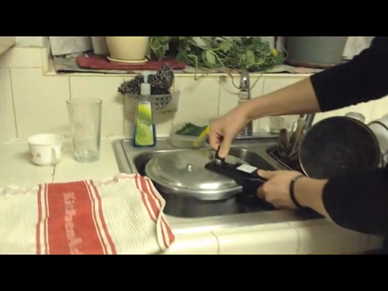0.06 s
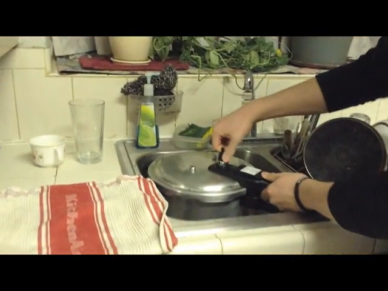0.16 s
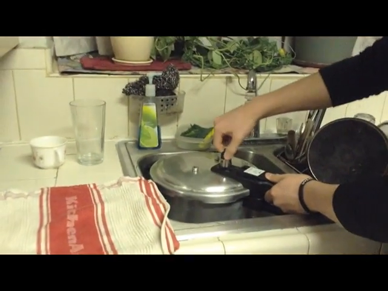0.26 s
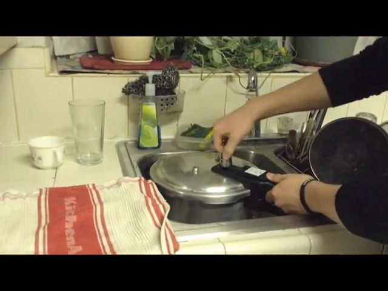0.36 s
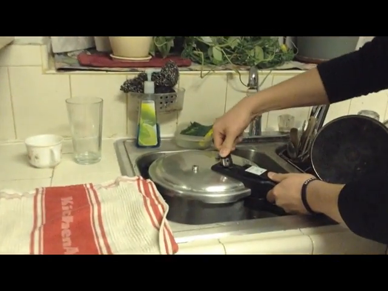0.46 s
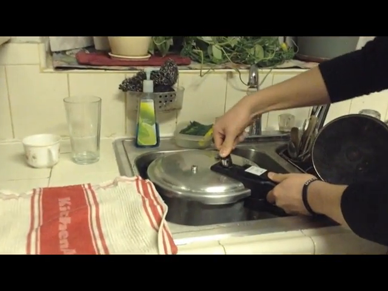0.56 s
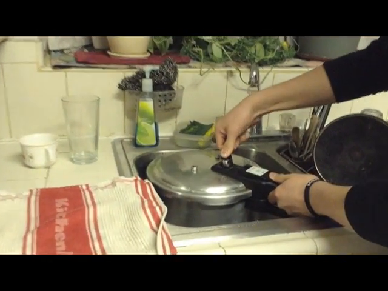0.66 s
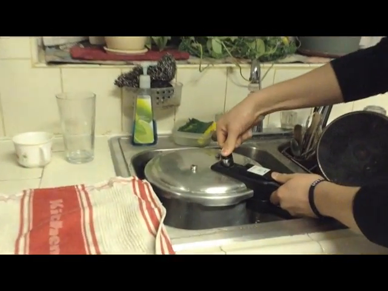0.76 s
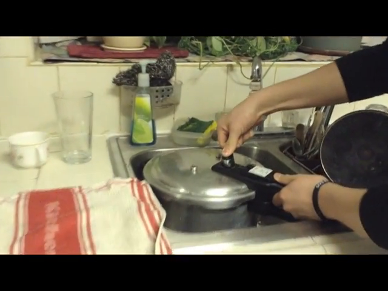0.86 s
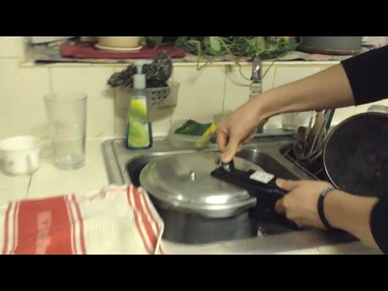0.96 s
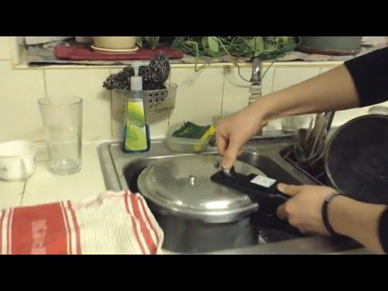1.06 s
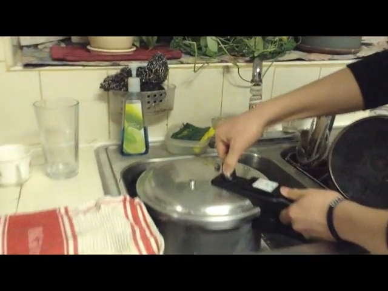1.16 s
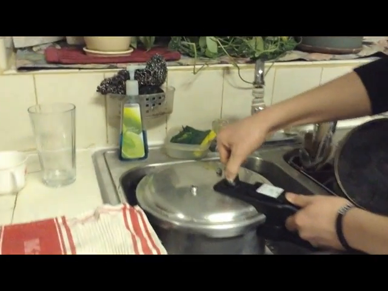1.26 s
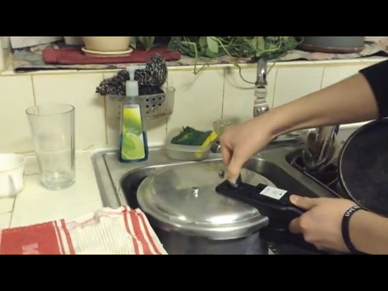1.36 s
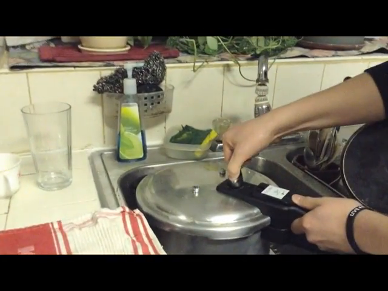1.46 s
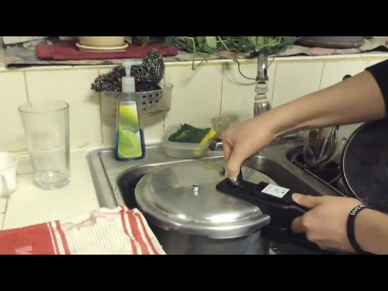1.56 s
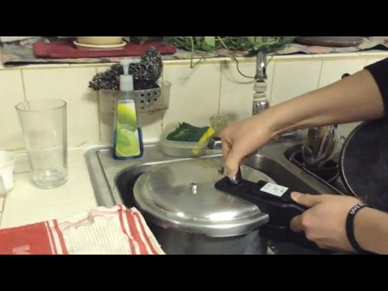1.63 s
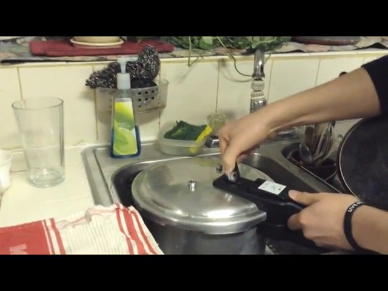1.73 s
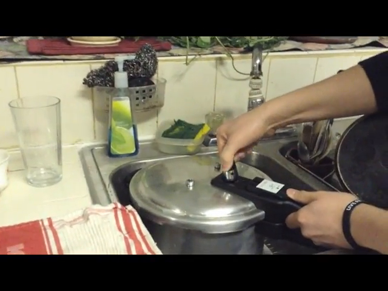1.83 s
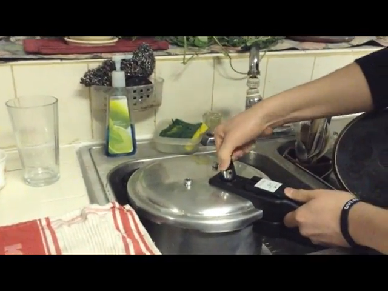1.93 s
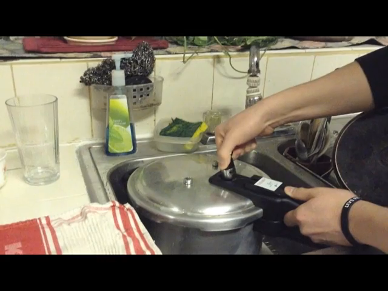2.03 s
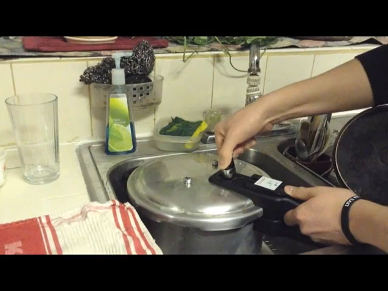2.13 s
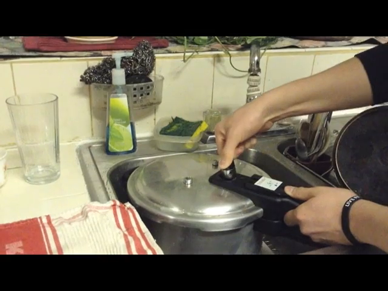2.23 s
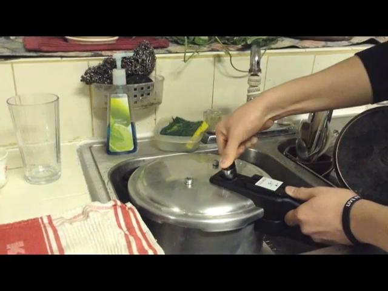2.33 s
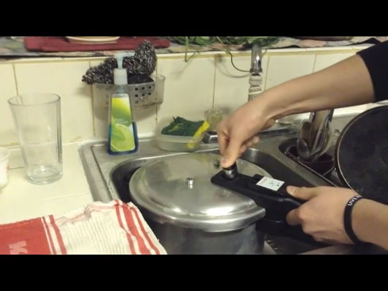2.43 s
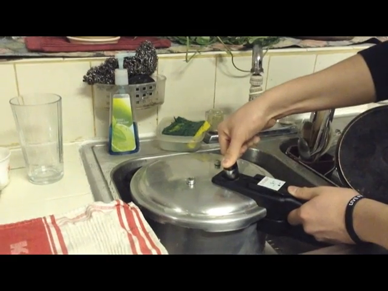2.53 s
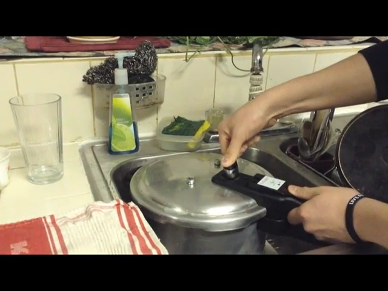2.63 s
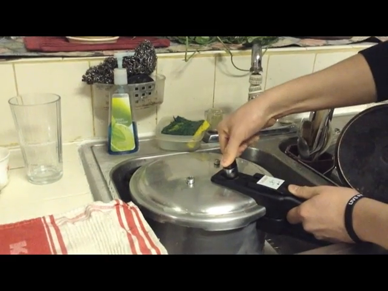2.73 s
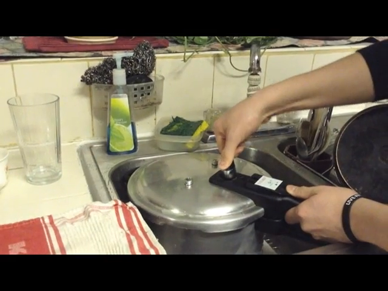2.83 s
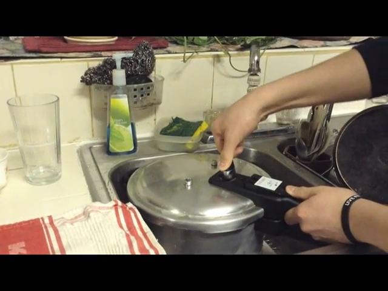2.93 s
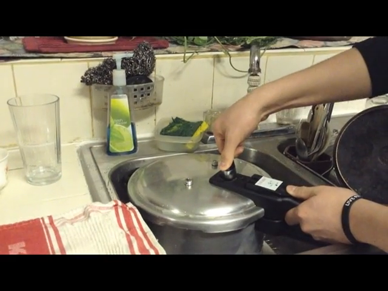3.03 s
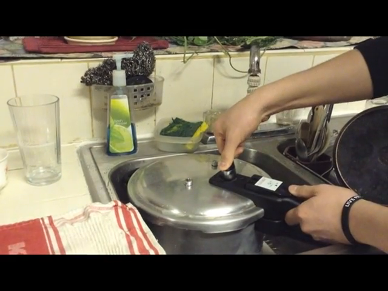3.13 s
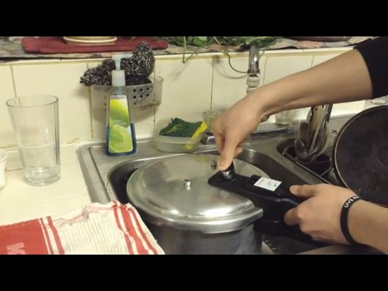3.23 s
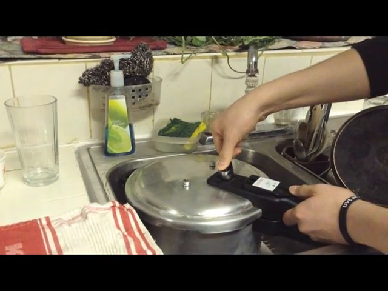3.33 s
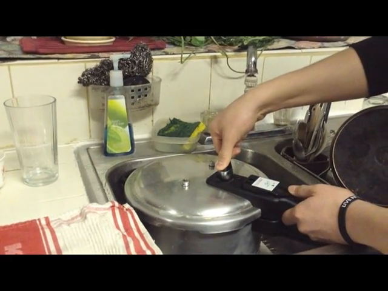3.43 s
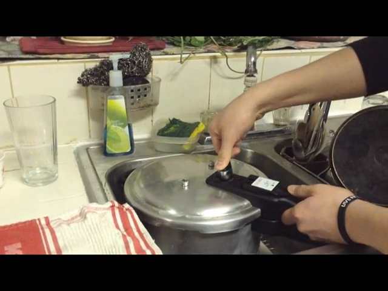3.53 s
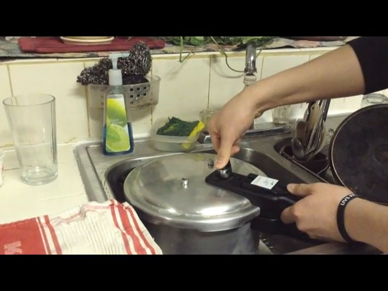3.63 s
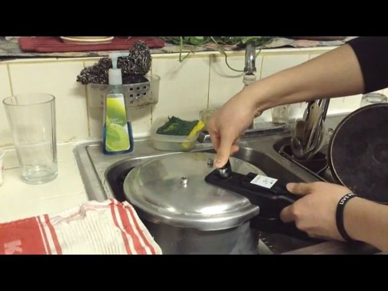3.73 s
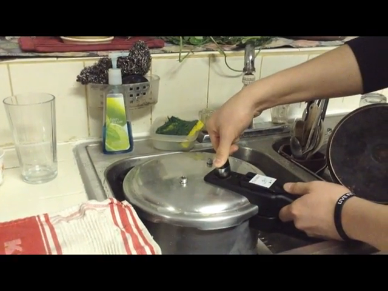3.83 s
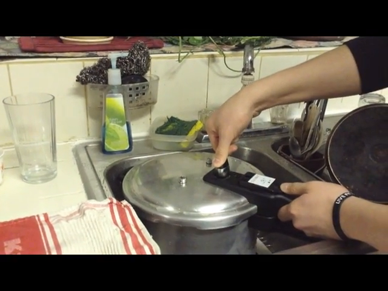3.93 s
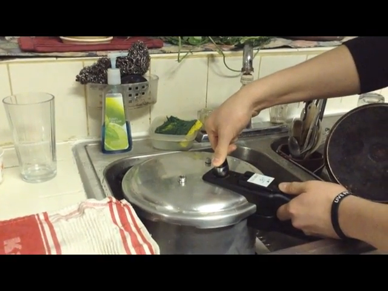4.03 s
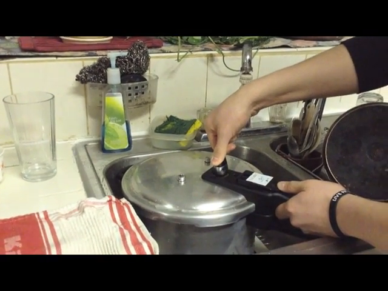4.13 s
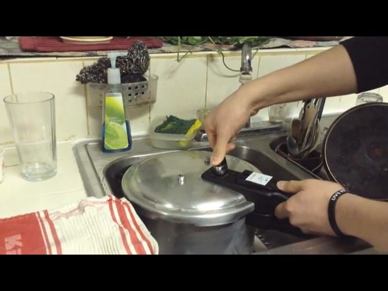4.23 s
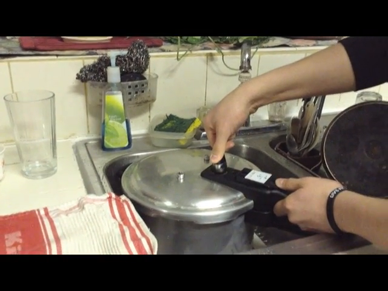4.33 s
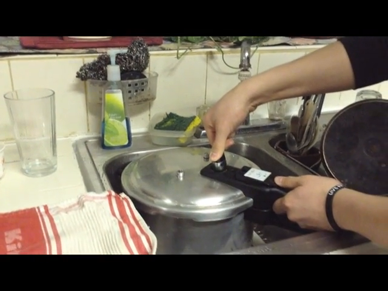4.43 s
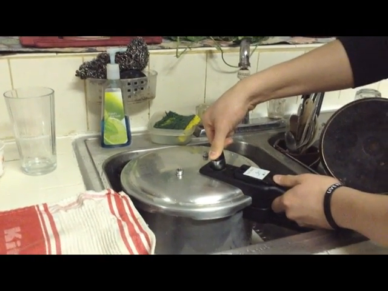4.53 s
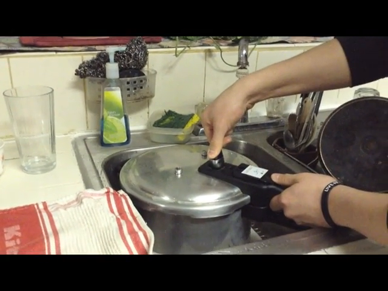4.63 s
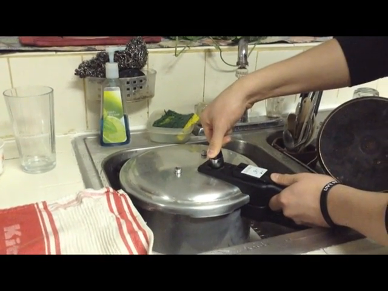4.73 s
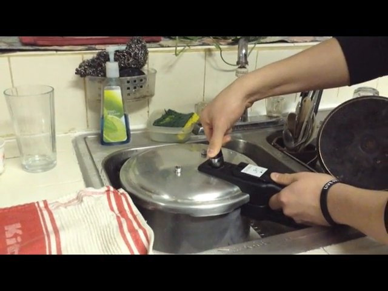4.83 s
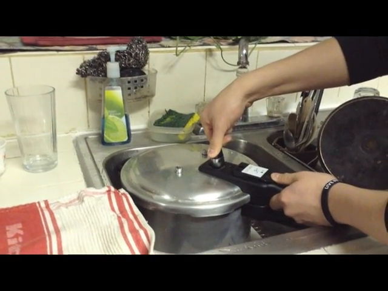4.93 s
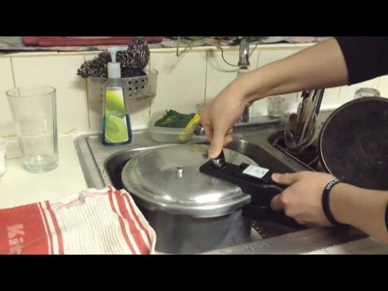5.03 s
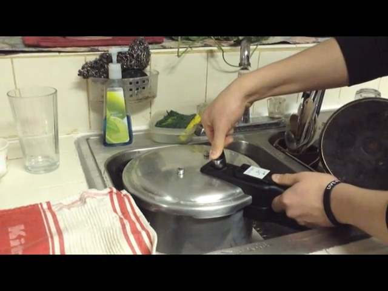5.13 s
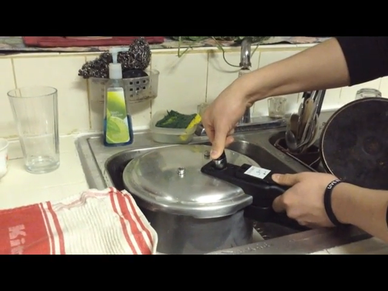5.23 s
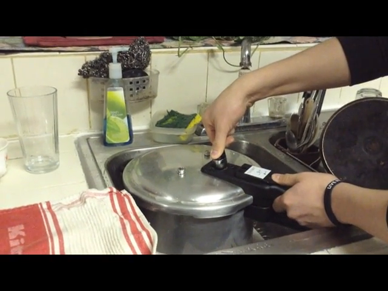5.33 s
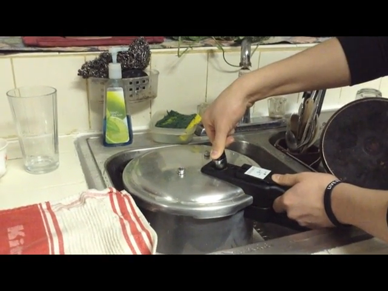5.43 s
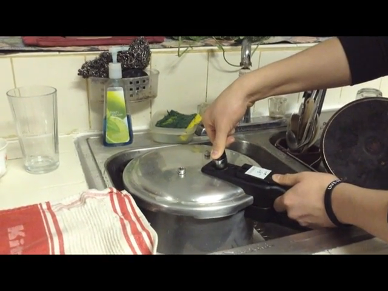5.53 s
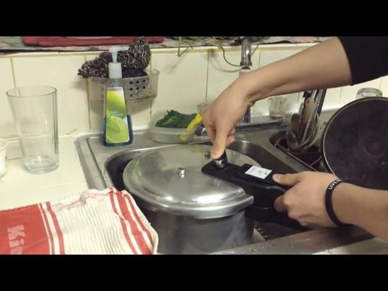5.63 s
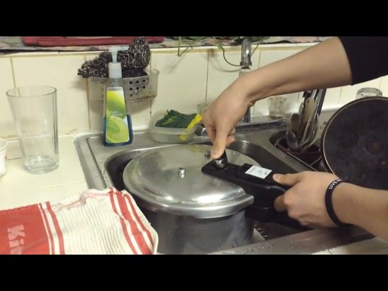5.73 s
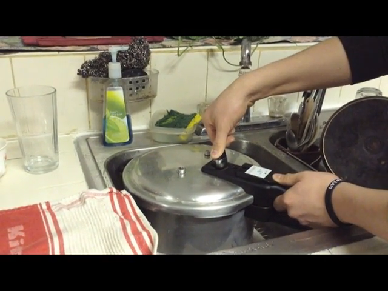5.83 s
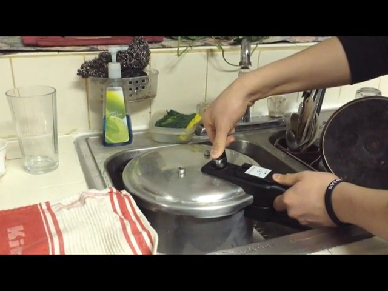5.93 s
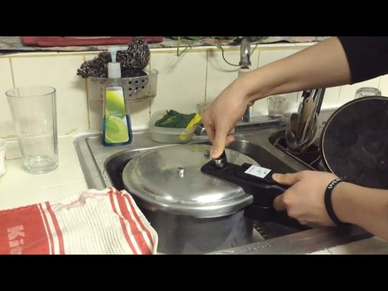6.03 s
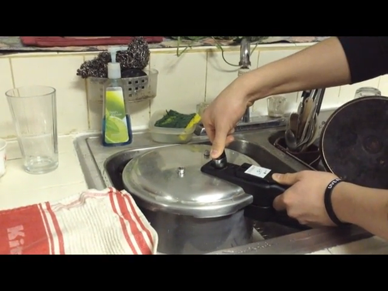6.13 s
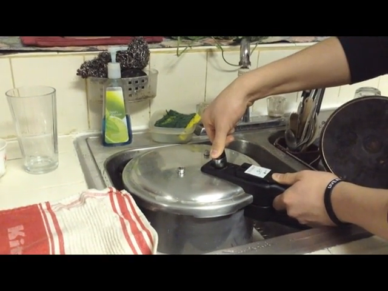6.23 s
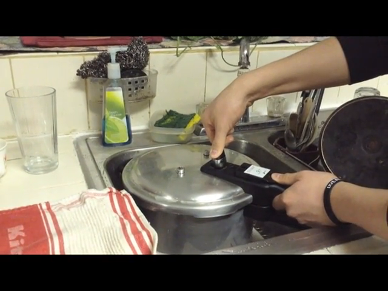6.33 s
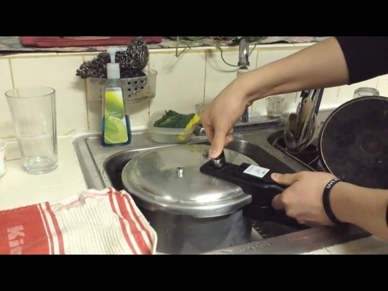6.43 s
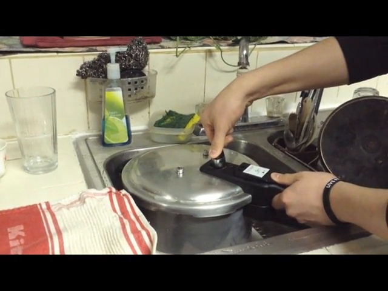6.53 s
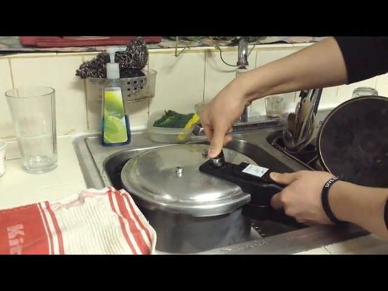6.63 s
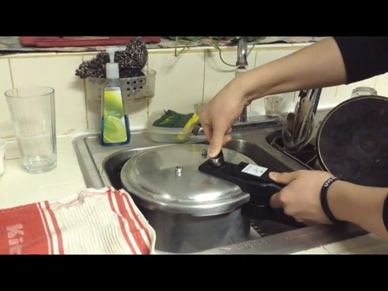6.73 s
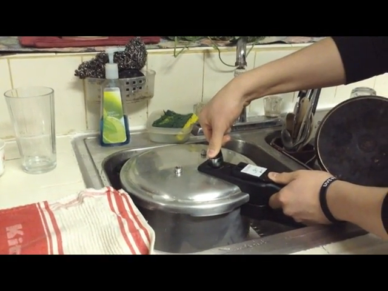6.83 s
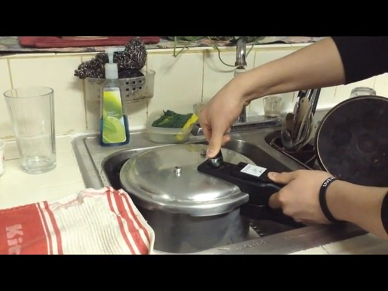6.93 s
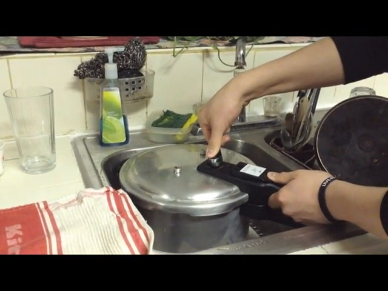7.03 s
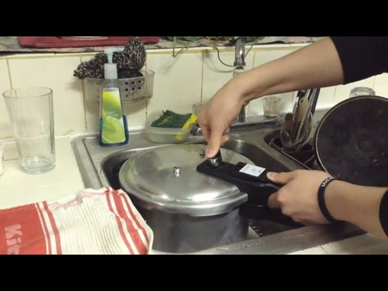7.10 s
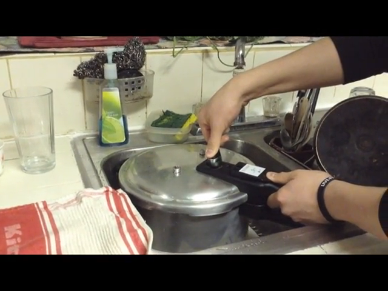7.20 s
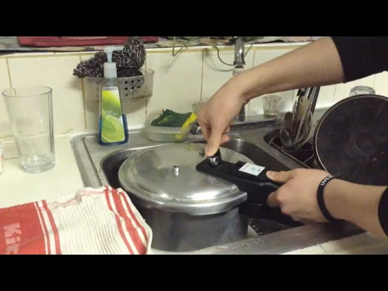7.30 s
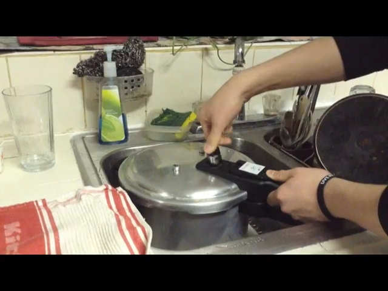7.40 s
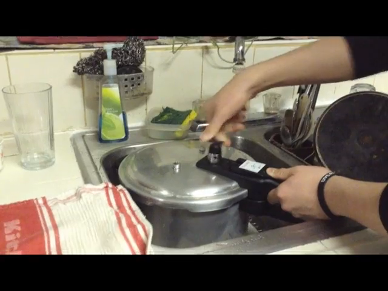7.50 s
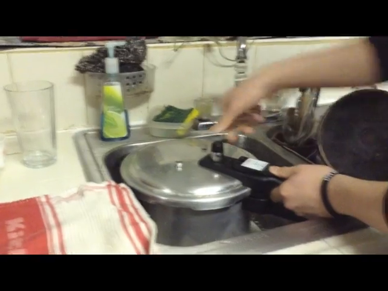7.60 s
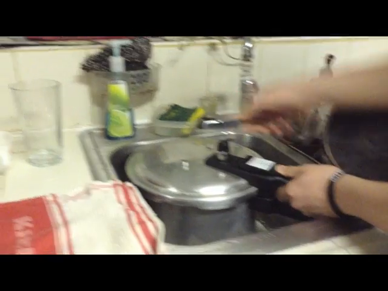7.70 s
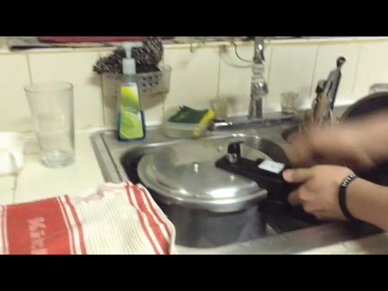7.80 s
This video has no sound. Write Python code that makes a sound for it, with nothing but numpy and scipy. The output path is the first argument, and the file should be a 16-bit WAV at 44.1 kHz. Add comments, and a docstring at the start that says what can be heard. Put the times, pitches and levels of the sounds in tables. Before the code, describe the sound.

A pressure cooker in a kitchen sink lets out a loud, wet, sputtering blast of steam. It settles into a high hiss that slowly fades, with a few small spits and a dull bump of the pot. Liquid simmers faintly. At the end the valve weight scrapes softly, clicks twice and lands on the metal lid with a sharp clank. The small room has a brief echo and a low hum, heard in mono.

```python
"""In a small tiled kitchen, a pressure cooker stands in the sink while a hand tilts its valve weight.
Steam blasts out wet and sputtering, then settles to a hiss that dies away with the pressure.
The liquid simmers and the pot bumps the sink. At the end the weight scrapes, clicks twice and
drops on the lid with a clank. The room echoes briefly and hums low; the sound is mono."""
import sys
import numpy as np
from scipy import signal
from scipy.fft import rfft, irfft, next_fast_len
from scipy.io import wavfile
from scipy.ndimage import map_coordinates

SR = 44100
rng = np.random.default_rng(int(sys.argv[2]) if len(sys.argv) > 2 else 0)


def generate_wav(sig):
    """Save sig (samples, or channels by samples) to the path in sys.argv[1] as 16-bit PCM at SR."""
    pcm = np.round(np.clip(np.atleast_2d(sig).T, -1, 1) * 32767).astype(np.int16)
    wavfile.write(sys.argv[1], SR, pcm)


N = 346626

# Levels in dB are relative. A fade time (t60) is how long a sound takes to drop by 60 dB.
# Pitches at which the steam rings. Each row: pitch in Hz, width in Hz, level in dB.
OPEN_VALVE = [(576, 7, -22), (1088, 16, -11), (1264, 3.9, -7), (1580, 99, -16), (1800, 42, -13),
              (2428, 21, -9.5), (3240, 85, -10), (3390, 28, -6), (3960, 115, -1), (4750, 63, -5),
              (5050, 19, 1.5), (5560, 41, -2.5)]
NARROW_VALVE = [(3090, 240, -8), (3566, 93, 3), (3885, 160, -0.5), (4203, 81, 1.5), (4460, 56, -2.5),
                (4720, 130, 0.5), (5095, 91, 0.5), (5230, 190, -5), (5723, 43, -8.5)]
WHISTLE = [(3530, 60, -1), (3690, 80, -1), (3900, 65, -6), (4170, 60, -3), (4540, 60, -13), (4780, 85, -7),
           (5060, 80, -7), (5290, 70, -3), (5690, 55, -12)]  # the valve at the last of the pressure
SLOW_RIM = [(10500, 330, -13.5), (12200, 200, -21), (13080, 200, -6), (13750, 230, 1), (14650, 450, -5)]  # the thin jet at the vent's rim, once it has slowed
LID_HOLLOW = [(809, 6.4, -3), (1264, 39, -2.5), (1904, 59, -6.5)]  # the space under the lid

# Tone colours of the noises. Each row: frequency in Hz, level there in dB.
ROAR = [(60, -61.5), (110, -36), (190, -15.5), (310, -13.5), (410, -30.5), (540, -10), (900, -12.5),
        (1200, -7.5), (2200, -6.5), (3400, -0.5), (5400, 5), (6500, -11), (11500, -15), (12900, -1),
        (14000, -8)]  # wide-open steam
TURBULENCE = [(200, -52), (450, -20), (800, -14.5), (2200, 0), (3000, 9), (5200, 1.5), (7000, -0.5),
              (8500, -5), (11000, -5), (12500, 1.5), (15000, -1.5)]  # swirls in the narrow gap
FAST_RIM = [(8500, -40), (9700, -21), (11000, -19), (12600, -7), (13750, 2), (15400, -9)]  # the thin jet while it is fast
PUFF = [(7500, -24.5), (9700, 3.5), (15000, -3)]  # the first spurt
SPIT = [(150, -42), (400, -15), (540, 1), (660, -8), (820, 2), (1000, -11), (1250, -3), (1500, -11),
        (1850, -5), (2600, -14), (9000, -34)]  # a drop in the valve
CRACK = [(110, -42), (240, -5), (420, -9), (560, -1), (900, -13), (1230, 8), (1600, -1), (2750, 2),
         (4800, -5), (6700, -12), (8000, -28), (12000, -28), (15000, -42)]  # the weight hitting its pipe
RASP = [(80, -20), (200, 9), (420, -6.5), (750, 1.5), (1500, 2), (3700, -6), (6500, -22), (14000, -36)]  # the weight sliding
BOIL = [(150, -35), (480, -11), (660, -1), (800, -1.5), (1150, -2), (1600, -5), (2500, -10), (4000, -14.5),
        (7000, -31)]  # the bubbling liquid
THUMP = [(50, -38), (95, -20), (170, 5), (270, -8), (410, -13), (510, 0), (640, -10), (810, -1),
         (1000, -14), (2500, -9), (12000, -17)]  # the pot against the sink
ROOM_TONE = [(70, -36), (110, -7), (150, -3.5), (187, 13), (235, -4.5), (280, 2), (320, -1), (500, -20),
             (1500, -9.5), (5000, -34.5), (15000, -25)]  # the kitchen's drone

# The weight is tipped wide open.
# Each row: start in seconds, hold in seconds, level in dB, treble limit in Hz.
SURGES = [(-.02, .29, -25, 14400), (0.265, 0.145, -21, 7300), (0.483, 0.093, -22, 4700),
          (.6, 0.054, -26, 4270), (.945, 0.017, -51, 4530), (2.71, .02, -48, 4200)]
# The hand drifts on the tilted weight. Each row: time in seconds, change in flow in dB.
GAP_OPENING = [(0, 1), (.76, 0.7), (1.3, 0.56), (1.76, 0.1), (1.92, 2), (2.03, 0.5), (2.11, 2.5),
               (2.48, 2.5), (2.64, 2), (2.98, 0.83), (4.6, 0), (5.5, 2)]
# The sizzle at the vent's rim. Each row: time in seconds, level against the flow in dB.
SIZZLE_LEVEL = [(.62, -4.5), (1.4, -2.2), (1.73, 1), (1.87, -2.5), (5.5, -5.5)]
# Notes of the hollow under the lid. Each row: peak time in seconds, pitch in Hz, level in dB.
HOOTS = [(1.165, 1257, -46), (1.49, 1257, -44.5), (1.99, 1257, -43), (2.09, 810, -47), (2.875, 1257, -47)]
# Drops spat through the valve. Each row: start in seconds, level in dB, brightness in dB per octave.
SPITS = [(0.284, -33.5, -1), (.749, -44.5, -5), (.86, -39, 4.5), (.89, -32.5, 7.5), (1.072, -42, 5.5),
         (1.234, -40.5, 3.5), (1.365, -43.5, -5), (1.984, -38, 10), (2.246, -42, -4.5), (2.28, -49, -6),
         (2.279, -50, -2), (2.355, -47.5, -4), (2.41, -51, -8), (2.87, -49.5, 1.5)]
# The weight meets the vent pipe.
# Each row: start in seconds, crack level in dB, lid ring level in dB, crack fade time in seconds.
CONTACTS = [(7.3785, -39, -52, .045), (7.432, -50, -53, .02), (7.533, -8.5, -26.5, .024),
            (7.536, -15, -24.5, .03), (7.5505, -25, -42, .03), (7.5622, -22, -31, .035),
            (7.5705, -27, -40, .035), (7.815, -55, -64, .25)]
# The notes of the metal lid. Each row: pitch in Hz, level in dB, fade time in seconds.
LID_NOTES = [(250, -12, .14), (516, -12, .1), (759, -10, .14), (1147, 4.5, .095), (1255, -1, .07),
             (1344, 2, .1), (1412, -3, .08), (1803, -1, .07), (1965, -4, .09), (2250, -7, .11),
             (2620, -5, .08), (3025, -7, .08), (3470, -7, .09), (4484, -13, .09)]
# Swells in the simmer; the last row is a soft rush of noise around the clank.
# Each row: peak time in seconds, half width in seconds, level in dB.
SWELLS = [(3.7, 0.095, -52), (4.37, 0.048, -50.5), (4.56, 0.049, -52.5), (6.15, 0.34, -54.5),
          (7.699, 0.23, -53)]
# The pot bumps the sink. Each row: start in seconds, level in dB.
BUMPS = [(.005, -37), (1.762, -31.5), (1.784, -39), (3.651, -52), (4.559, -52)]
# The room's lower hum swells and sinks. Each row: time in seconds, level in dB.
LOWER_HUM_LEVEL = [(.9, -8), (1.4, -1), (4.1, -3), (5.22, .5), (5.42, -4), (5.65, 6), (5.9, -8.5),
                   (6.42, 4), (6.85, -5)]
# The echo off the tiles. Each row: frequency in Hz, fade time in seconds.
ECHO_FADE = [(150, 0.52), (1000, 0.25), (4000, 0.18), (12000, 0.18)]


def blast():
    """Wet steam surges through the wide-open valve; water in the throat makes it sputter."""
    sputter_db = 0.5 * wobble(45.75) + 2.3 * wobble(260)
    jet = amp(-1.0) * blown(OPEN_VALVE) + amp(-0.5) * noise(ROAR)
    strengths = np.array([amp(db) * envelope(start, hold, attack=0.016, t60=0.36)
                          for start, hold, db, _ in SURGES])
    colours = np.array([filtered(jet, lambda hz: 1 / np.sqrt(1 + (hz / top_hz) ** 10))
                        for *_, top_hz in SURGES])
    strongest = strengths.argmax(axis=0)  # only one surge is heard at a time
    return amp(sputter_db) * np.choose(strongest, strengths * colours)


def hiss():
    """Dry steam rushes through the narrow gap; its swirls die sooner than the valve's ringing."""
    flow_db = steam_flow() + curve(GAP_OPENING)
    flutter_db = 0.28 * wobble(16) + 0.5 * wobble(110)
    # a fast stream damps the ringing, a slow one lets it whistle
    fast_share = np.interp(flow_db, [-47, -30], [0, 1])
    fast, slow = np.sqrt(fast_share), np.sqrt(1 - fast_share)
    valve = amp(flow_db - 3.0) * (fast * blown(NARROW_VALVE) + slow * blown(WHISTLE))
    swirls = amp(1.796 * flow_db + 17.0) * noise(TURBULENCE)
    hollow = amp(1.53 * steam_flow() - 9.5 + 1.2 * wobble(22.14)) * blown(LID_HOLLOW)
    sizzle = fast * noise(FAST_RIM) + slow * blown(SLOW_RIM)
    rim = amp(rim_level() + 0.7 * wobble(40)) * sizzle
    return amp(flutter_db) * (valve + swirls + hollow + rim)


def steam_flow():
    """Strength of the steam in dB: the jet slows at an even pace until the steam runs out."""
    full_db, empty_s, speed_power = -26.5, 7.276, 1.381
    speed = np.maximum(1 - np.arange(N) / SR / empty_s, 1e-3)
    return full_db + speed_power * 20 * np.log10(speed)


def rim_level():
    """Strength of the thin jet in dB: it follows the flow and collapses at low pressure."""
    flow_db = steam_flow()
    stall_db = -45.5  # the collapse begins below this flow
    collapse_db = 1.8 * np.minimum(flow_db - stall_db, 0)
    return flow_db + curve(SIZZLE_LEVEL) + collapse_db


def puff():
    """A short bright spurt escapes as the seal first gives way."""
    track = np.zeros(N)
    add(track, start=0.0091, sound=amp(-13) * burst(PUFF, t60=0.063, attack=0.0032))
    return track


def hoots():
    """The flow briefly catches a note of the hollow under the lid."""
    t = np.arange(N) / SR
    return sum(amp(db) * swell(t, peak, half_width=0.022) * fuzzy_tone(hz, blur_hz=14.2, size=N)[0]
               for peak, hz, db in HOOTS)


def spits():
    """Each drop makes a short hollow sputter under the lid, with its own loudness and brightness."""
    track = np.zeros(N)
    for start, db, brightness in SPITS:
        colour = [(hz, level + brightness * np.log2(hz)) for hz, level in SPIT]
        add(track, start, amp(db + 4.5) * burst(colour, t60=0.087, attack=0.00049))
    return track


def valve_weight():
    """The weight scrapes on its pipe; then each hit cracks and rings a new mix of the lid's notes."""
    slide = envelope(start=7.083, hold=0.02, attack=0.02, t60=0.49)
    track = slide * amp(-46.5 + 1.4 * wobble(250)) * noise(RASP)
    t = np.arange(SR // 3) / SR
    hz, note_db, t60 = np.transpose(LID_NOTES)[:, :, None]
    for start, crack_db, ring_db, crack_t60 in CONTACTS:
        strength = amp(note_db + 1.7 * rng.standard_normal(hz.shape))
        tones = fuzzy_tone(hz, blur_hz=10.4, size=len(t))  # the loose weight blurs the notes
        notes = strength * amp(-60 * t / t60) * tones
        ring = notes.sum(axis=0) * (1 - np.exp(-t / 0.0007))
        crack = burst(CRACK, crack_t60, attack=0.00072)
        add(track, start, amp(ring_db) * ring + amp(crack_db) * crack)
    return track


def pot_bumps():
    """The heavy pot knocks dully against the sink."""
    track = np.zeros(N)
    for start, db in BUMPS:
        add(track, start, amp(db) * burst(THUMP, t60=0.3, attack=0.00067))
    return track


def simmer():
    """The liquid bubbles unevenly as the pressure falls; a soft rush of noise swells around the clank."""
    t = np.arange(N) / SR
    steady = amp(-51 - 1.58 * t)  # falls 1.58 dB each second
    swells = [amp(db) * swell(t, peak, half_width) for peak, half_width, db in SWELLS]
    strength = amp(-3.0) * np.linalg.norm([steady, *swells], axis=0)  # their powers add up
    bubbling_db = 1.2 * wobble(25) + 2.2 * wobble(140)
    return strength * unit(amp(bubbling_db) * noise(BOIL))


def kitchen_echo(x):
    """Sound bounces around the tiled room; the treble dies first."""
    hz, t, spectrum = signal.stft(rng.standard_normal(SR // 2), SR, nperseg=256)
    fade = amp(-60 * t / along(ECHO_FADE, hz)[:, None])
    tail = signal.istft(spectrum * fade, SR, nperseg=256)[1]
    first_wall_delay = np.zeros(SR // 300)
    return signal.fftconvolve(x, np.r_[first_wall_delay, tail / np.linalg.norm(tail)])[:N]


def room_tone():
    """A low wavering drone fills the kitchen; its two hums swell and sink on their own."""
    split_hz = 235
    tone = noise(ROOM_TONE)
    lower = filtered(tone, lambda hz: hz < split_hz)
    upper = filtered(tone, lambda hz: (hz >= split_hz) & (hz < 2 * split_hz))
    air = tone - lower - upper
    hums = amp(curve(LOWER_HUM_LEVEL) + wobble(12)) * lower + amp(wobble(4.15)) * upper
    return amp(-62.5) * (hums + air)


def amp(db):
    """Turn decibels into a number to multiply by."""
    return 10 ** (np.asarray(db) / 20)


def unit(x):
    """Scale x to an average strength (rms) of 1."""
    return x / np.sqrt(np.mean(x ** 2) + 1e-20)


def along(points, hz):
    """Read between (Hz, value) rows, with octaves evenly spaced."""
    frequencies, values = np.transpose(points)
    return np.interp(np.log(hz + 1), np.log(frequencies + 1), values)


def curve(rows):
    """Join (seconds, value) rows with straight lines, one value per sample."""
    return np.interp(np.arange(N) / SR, *np.transpose(rows))


def wobble(rate):
    """A smooth curve through `rate` random values a second."""
    return map_coordinates(rng.standard_normal(int(N * rate / SR) + 4), [np.arange(N) * rate / SR])


def envelope(start, hold, attack, t60):
    """A loudness shape that rises, holds, then dies away; times are in seconds."""
    t = np.arange(N) / SR - start
    return np.clip(t / attack, 0, 1) * amp(-60 * np.maximum(t - hold, 0) / t60)


def swell(t, peak, half_width):
    """A bell-shaped rise and fall; times are in seconds."""
    return np.exp(-((t - peak) / half_width) ** 2 / 2)


def filtered(x, response):
    """Turn each frequency in x up or down by response(hz)."""
    size = next_fast_len(len(x) + 8192)
    return irfft(rfft(x, size) * response(np.fft.rfftfreq(size, 1 / SR)), size)[:len(x)]


def noise(colour, size=N):
    """Noise with the given tone colour, at strength 1."""
    return unit(filtered(rng.standard_normal(size), lambda hz: amp(along(colour, hz))))


def blown(peaks):
    """Rushing noise that rings at the given pitches, at strength 1."""
    def gain(hz):
        heights = (amp(db) / (1 + ((hz - pitch) / width) ** 2) for pitch, width, db in peaks)
        return np.sqrt(sum(height ** 2 for height in heights))
    return unit(filtered(rng.standard_normal(N), gain))


def burst(colour, t60, attack):
    """A third of a second of noise that starts fast and dies away."""
    t = np.arange(SR // 3) / SR
    return noise(colour, size=len(t)) * amp(-60 * t / t60) * (1 - np.exp(-t / attack))


def fuzzy_tone(hz, blur_hz, size):
    """Sine waves that drift at random, spreading each pitch over a band blur_hz wide."""
    drift = np.sqrt(2 * np.pi * blur_hz / SR) * rng.standard_normal((np.size(hz), size))
    start_phase = 2 * np.pi * rng.random((np.size(hz), 1))
    return np.sin(start_phase + np.cumsum(2 * np.pi * hz / SR + drift, axis=1))


def add(track, start, sound):
    """Mix a sound into the track at `start` seconds."""
    part = track[round(start * SR):][:len(sound)]
    part += sound[:len(part)]


def scene():
    """Steam, pot and room, alike in both ears."""
    steam = puff() + blast() + hiss() + hoots() + spits() + simmer()
    metal = valve_weight() + pot_bumps()
    direct = amp(-1.5) * steam + metal
    mono = direct + amp(-8.5) * kitchen_echo(direct) + room_tone()
    return np.array([mono, mono])


def record(dry):
    """A small microphone loses the deep bass and cuts off the highest treble."""
    bass_hz, top_hz = 95, 15400
    response = lambda hz: hz ** 2 / (hz ** 2 + bass_hz ** 2) / (1 + (hz / top_hz) ** 200)
    return np.array([filtered(channel, response) for channel in dry])


dry = scene()
out = record(dry)
generate_wav(out)
```